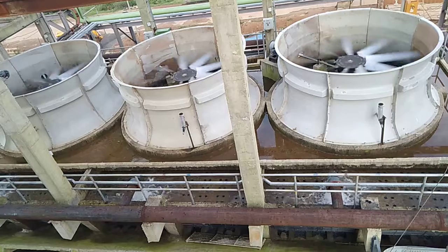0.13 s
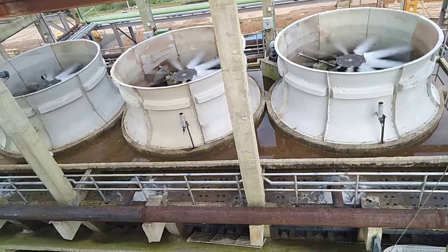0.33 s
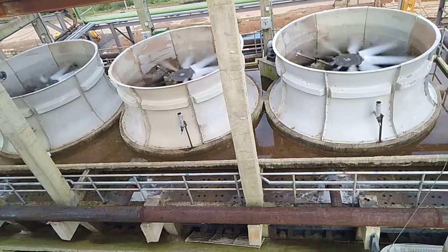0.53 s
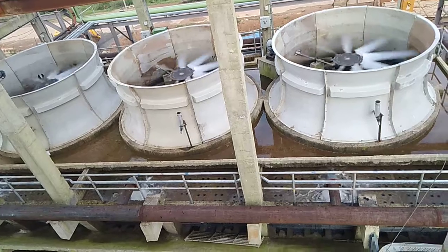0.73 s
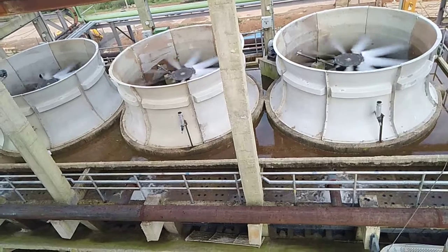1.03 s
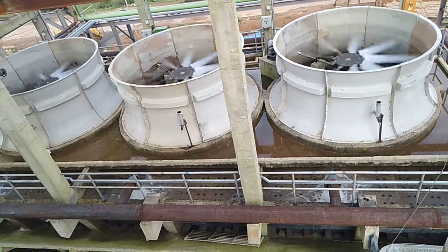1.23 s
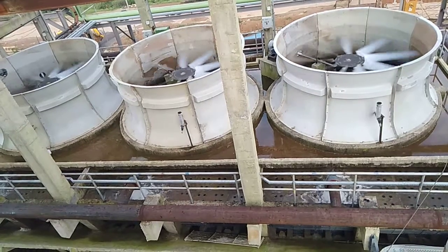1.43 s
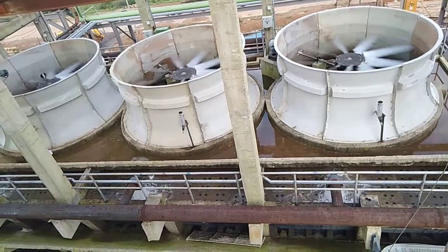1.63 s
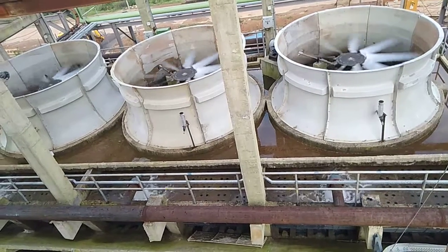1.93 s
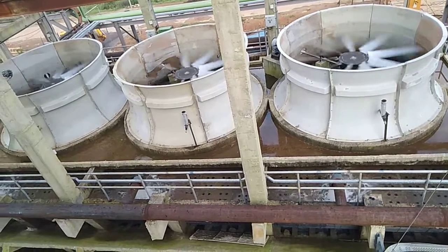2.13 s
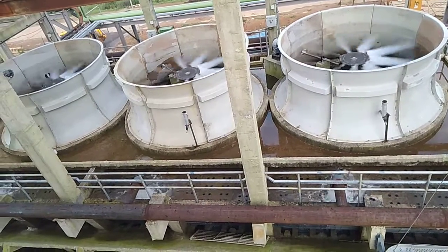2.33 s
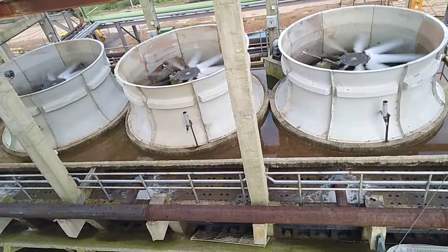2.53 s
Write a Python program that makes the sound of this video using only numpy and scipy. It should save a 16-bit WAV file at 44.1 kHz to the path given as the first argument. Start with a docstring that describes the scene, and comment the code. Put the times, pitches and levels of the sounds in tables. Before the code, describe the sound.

Large cooling tower fans roar steadily at an outdoor industrial site. Silence lasts until 0.1 s, then the sound fades in thinly, reaching full level by 0.35 s; at about 0.3 s the bass opens with a soft low thump. Dense low rushing air, deep motor hum, faint wavering whine and bright, finely spattering water hiss continue to the end, around 2.7 s, with only slight level changes.

```python
"""A walkway above large cooling tower fans, heard on one microphone.
The motors hum in steady sines on multiples of a shaft tone; gear meshes add a faint, beating whine.
Air roars through the stacks as shaped noise pulsing at the shaft tone.
Falling water hisses as high shaped noise with a fine spatter of random clicks.
After brief silence the sound fades in; shortly after, the bass opens up with a soft low thump."""
import sys
import numpy as np
from scipy import signal
from scipy.fft import rfft, irfft, next_fast_len
from scipy.io import wavfile
from scipy.ndimage import uniform_filter1d, map_coordinates

SR = 44100
rng = np.random.default_rng(int(sys.argv[2]) if len(sys.argv) > 2 else 0)


def magnitude_from_level(level_db):
    """Linear magnitude for a level in decibels (20 dB per decade)."""
    exponent = np.asarray(level_db, float) / 20
    return 10 ** exponent


def generate_wav(signal):
    """Clip the signal to [-1, 1] and save it as 16-bit WAV at the path in sys.argv[1]."""
    frames = np.transpose(np.atleast_2d(signal))
    scaled = np.clip(frames, -1, 1) * 32767
    pcm = np.round(scaled).astype(np.int16)
    wavfile.write(sys.argv[1], SR, pcm)


N = 118188  # samples
SHAFT_HZ = 48.6


def curve(points, at):
    """Linear interpolation: straight lines between (position, value) points."""
    return np.interp(at, *np.transpose(points))


def unit(x):
    """Power normalisation: scales a signal to rms 1."""
    return x / np.sqrt(np.mean(x ** 2) + 1e-20)


def wobble(knots_per_s):
    """Slow random modulation: a spline through normally distributed knots."""
    knots = rng.standard_normal(int(N * knots_per_s / SR) + 4)
    return map_coordinates(knots, [np.arange(N) * knots_per_s / SR])


def filtered(x, response):
    """Linear filtering: multiplies the spectrum by a complex response of frequency."""
    size = next_fast_len(N + 8192)  # room for the filter to ring out
    spectrum = rfft(x, size) * response(np.fft.rfftfreq(size, 1 / SR))
    return irfft(spectrum, size)[:N]


def coloured(x, spectrum):
    """Spectral shaping: follows (Hz, dB) points on a log frequency axis, then scales to rms 1."""
    hz, db = np.transpose(spectrum)

    def response(f):
        return magnitude_from_level(np.interp(np.log(f + 1), np.log(hz + 1), db))

    return unit(filtered(x, response))


def patchy(patchy_db, bins):
    """Nonstationary noise: white noise given random gain in patches of time and frequency."""
    noise = signal.stft(rng.standard_normal(N), nperseg=512)[2]
    field = uniform_filter1d(rng.standard_normal(noise.shape), bins, 0)  # across frequency
    field = uniform_filter1d(field, 12, 1)  # across time frames
    return signal.istft(noise * magnitude_from_level(patchy_db * unit(field)), nperseg=512)[1][:N]


def tone(hz, db, waver_db):
    """Amplitude modulation: a sine of fixed pitch whose level wavers slowly."""
    phase = 2 * np.pi * (hz * np.arange(N) / SR + rng.random())
    level = magnitude_from_level(db + waver_db * wobble(knots_per_s=3.04))
    return np.sqrt(2) * level * np.sin(phase)  # root two makes the level an rms one


# Levels in the next three tables are rms, before wavering and the overall level.
# Shaft orders of the hum: shaft_multiple, level_db
SHAFT_ORDERS = [(1, -36.5), (2, -27), (3, -30), (4, -36), (6, -45.5)]
# Gear mesh tones, the first two close enough to beat: pitch_hz, level_db
GEAR_MESHES = [(1378.3, -45), (1376.8, -48), (1772.5, -51), (1058, -51)]
# Sidebands of the first mesh: offset_in_shaft_multiples, level_db
MESH_SIDEBANDS = [(-2, -49), (-1, -47), (1, -49)]


def motors():
    """Rotating machinery: periodic forces give shaft orders, gear meshes and their sidebands."""
    hum = sum(tone(k * SHAFT_HZ, db, waver_db=-1) for k, db in SHAFT_ORDERS)
    whine = sum(tone(hz, db, waver_db=5.5) for hz, db in GEAR_MESHES)
    mesh_hz = GEAR_MESHES[0][0]
    sidebands = sum(tone(mesh_hz + k * SHAFT_HZ, db, waver_db=1.0) for k, db in MESH_SIDEBANDS)
    return hum + whine + sidebands


# Spectrum of the air roar, relative density per Hz: frequency_hz, level_db
ROAR_SPECTRUM = [(8, -23), (28, -28), (58, -13.5), (72, -22.5), (84, -0.5), (110, -17.5), (125, 3),
                 (140, -0.5), (157, -7.5), (170, 0.5), (207, -7.5), (222, -3), (250, -6.5), (330, -7),
                 (420, -4), (560, -9.5), (718, -15), (1200, -12.5), (1490, -14.5), (1950, -15), (2200, -22),
                 (2730, -26.5), (5200, -42.5), (9000, -120)]


def air():
    """Turbulence noise: broadband air through the stacks, throbbing a little with the shaft."""
    phase = 2 * np.pi * (SHAFT_HZ * np.arange(N) / SR + rng.random())
    throb = 1 + 0.092 * np.sin(phase)
    level = magnitude_from_level(-22.5 + 0.29 * wobble(knots_per_s=9.15))
    return level * coloured(throb * patchy(patchy_db=0.66, bins=4), ROAR_SPECTRUM)


# Falling water as the microphone colours it, relative density per Hz: frequency_hz, level_db
WATER_SPECTRUM = [(600, -120), (1500, -21), (2730, -10), (3900, -5), (5170, -10), (6500, -5), (7870, 2),
                  (9200, -5.5), (10700, -8), (13100, -7.5), (14900, -4), (15400, -0.5), (15800, -4.5)]
DROPS_PER_S, DROPS_DB = 3000, -10.5  # mean rate; rms level against the dense hiss


def water():
    """Superposed random impacts: dense far hiss with a fine spatter of single drops."""
    struck = rng.random(N) < DROPS_PER_S / SR
    drops = struck * rng.standard_normal(N)
    splash = unit(patchy(patchy_db=0.8, bins=9)) + magnitude_from_level(DROPS_DB) * unit(drops)
    level = magnitude_from_level(-33.5 + 0.43 * wobble(knots_per_s=12.15))
    return level * coloured(splash, WATER_SPECTRUM)


# Small rises and dips of the whole sound: time_s, level_db
OVERALL_LEVEL = [(0.36, 0.6), (0.46, 0.3), (0.7, 0.76), (0.95, 0.2), (1.1, -0.4), (1.4, 0.9), (1.47, 0.2),
                 (1.53, -1.6), (1.68, 0.35), (1.85, 0.5), (1.96, 1.5), (2.03, -1.2), (2.15, 0.5),
                 (2.3, 0.2), (2.45, 0), (2.55, 0.9), (2.66, -0.4)]


def scene():
    """Linear superposition: all sources add at one microphone, alike in both channels."""
    level = magnitude_from_level(curve(OVERALL_LEVEL, np.arange(N) / SR))
    mix = (motors() + air() + water()) * level
    return np.array([mix, mix])


def top_cut(x):
    """Nothing passes above the cut-off."""
    return signal.sosfilt(signal.butter(12, 15900, fs=SR, output="sos"), x)


def record(dry):
    """Linear filtering and gain: fade-in, a low cut that drops out with a decaying offset, band limit."""
    fade_from_s, fade_to_s, fade_start = 0.1048, 0.35, 0.12  # start is a share of full amplitude
    bass_opens_s, low_cut_hz, top_hz = 0.293, 85, 15790
    thump_db, thump_t60_s = -22, 0.6  # t60: time to fall by 60 dB
    t = np.arange(N) / SR

    # two first-order high-pass stages in cascade
    thin = filtered(dry[0], lambda f: (1j * f / (1j * f + low_cut_hz)) ** 2)
    opened = np.clip((t - bass_opens_s) / 0.0049, 0, 1)
    opening = thin + opened * (dry[0] - thin)

    onset = np.clip((t - fade_from_s) / 0.0029, 0, 1)
    fade = onset * curve([(fade_from_s, fade_start), (fade_to_s, 1)], t)
    limited = filtered(fade * opening, lambda f: f < top_hz)
    limited = limited * (t > fade_from_s)  # silence before the fade

    # the thump is a one-sided offset that decays exponentially
    thump = magnitude_from_level(thump_db - 60 * (t - bass_opens_s) / thump_t60_s) * opened
    mono = limited + thump
    return top_cut(np.array([mono, mono]))


dry = scene()
out = record(dry)
generate_wav(out)
```